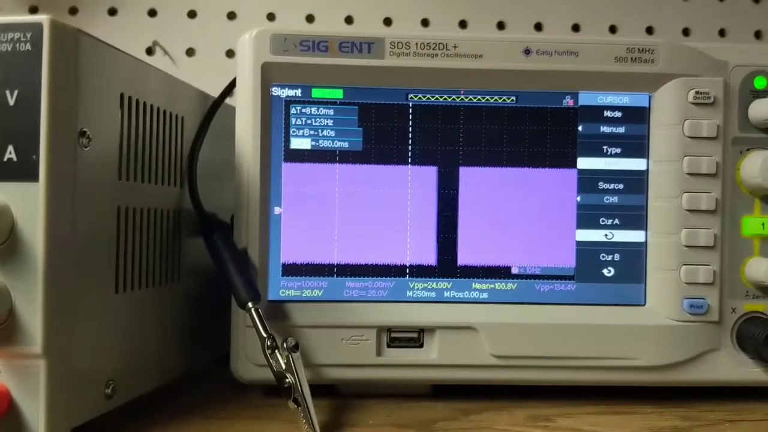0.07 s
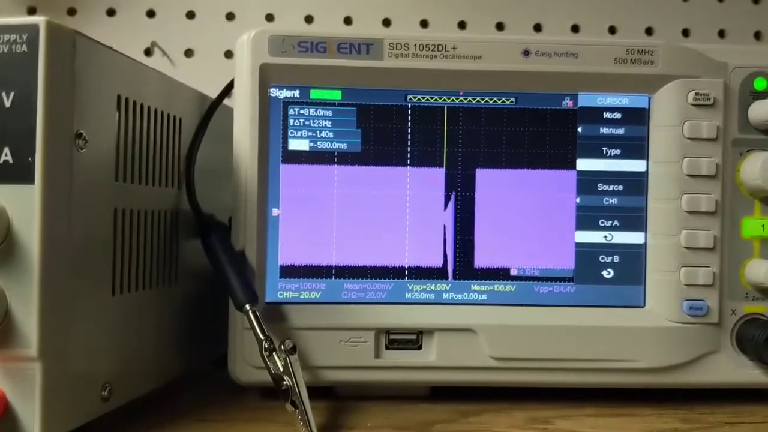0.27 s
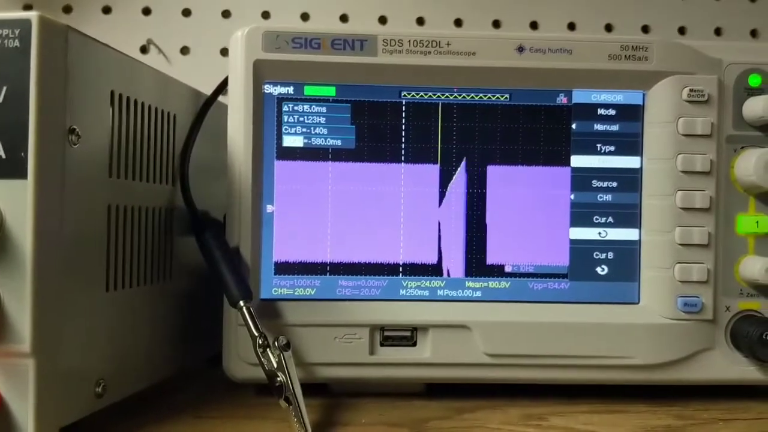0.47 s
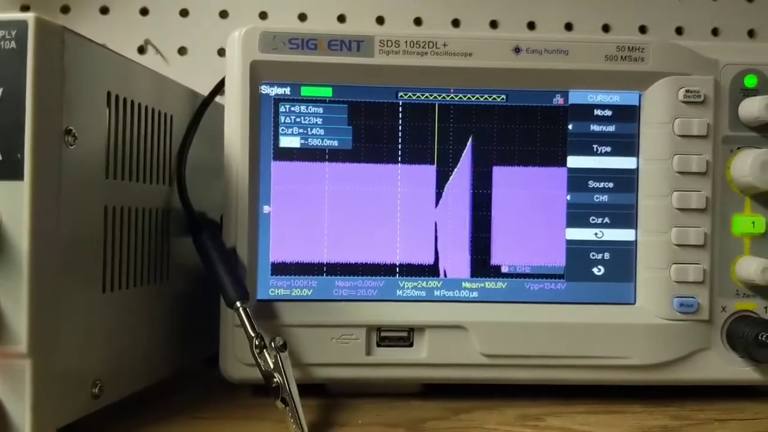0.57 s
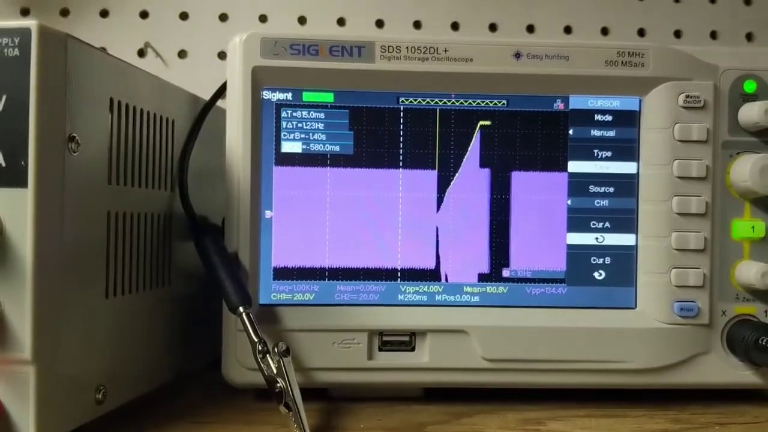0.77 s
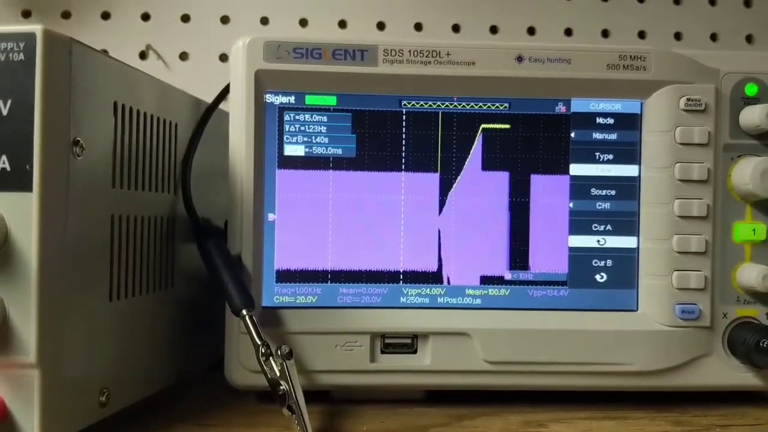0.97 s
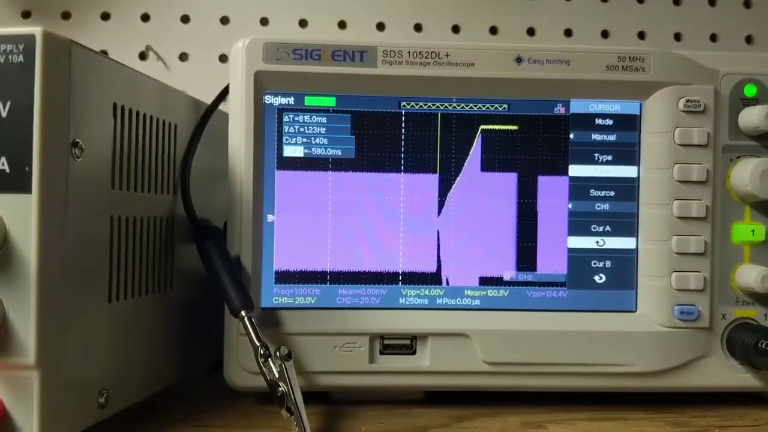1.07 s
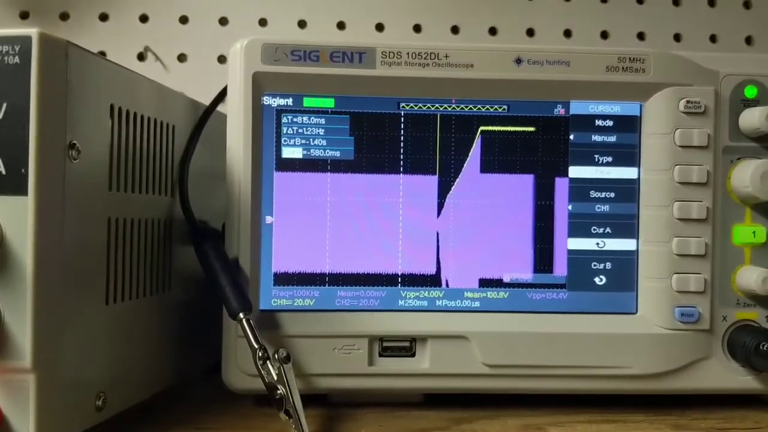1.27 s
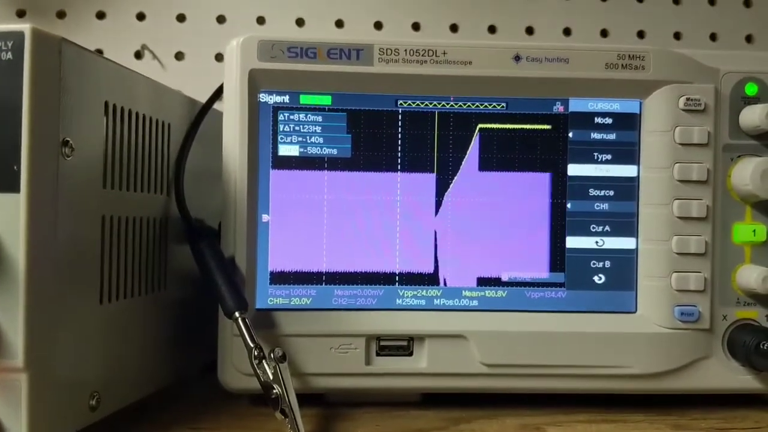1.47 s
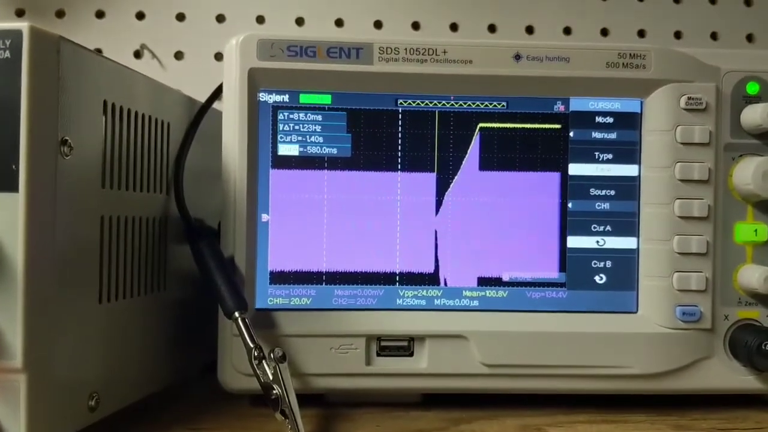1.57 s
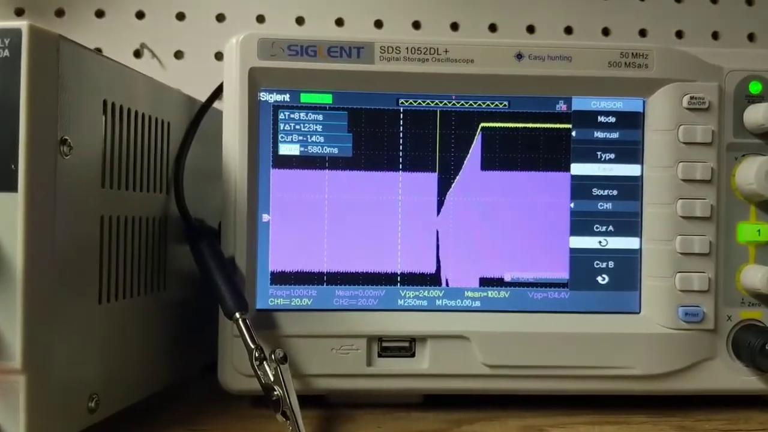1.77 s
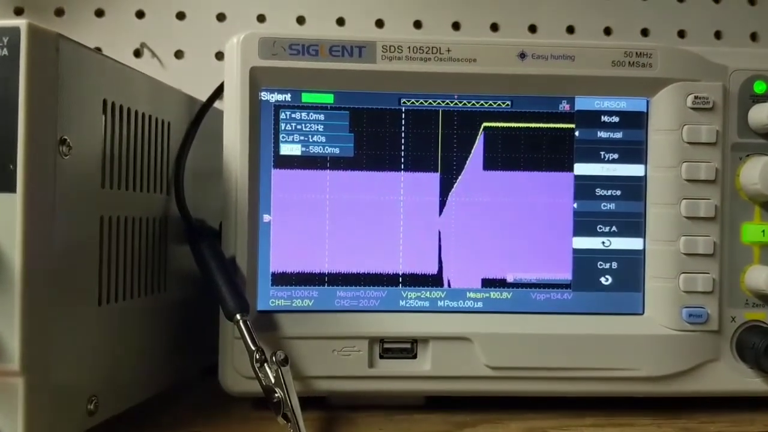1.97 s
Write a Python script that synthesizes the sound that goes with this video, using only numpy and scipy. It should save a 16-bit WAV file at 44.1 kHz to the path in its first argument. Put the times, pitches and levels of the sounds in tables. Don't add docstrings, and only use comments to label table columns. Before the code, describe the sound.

A single sharp spark snap from a shorted capacitor comes almost at once, with bright metallic crackle and a short small-room echo; afterwards only quiet fan hiss, faint whine and low air rumble, picked up by a small microphone.

```python
import sys
import numpy as np
from scipy import signal
from scipy.fft import rfft, irfft
from scipy.io import wavfile
from scipy.ndimage import uniform_filter1d, map_coordinates

SR = 44100
rng = np.random.default_rng(int(sys.argv[2]) if len(sys.argv) > 2 else 0)


def wav_out(sig):
    wavfile.write(sys.argv[1], SR, np.round(np.clip(np.atleast_2d(sig).T, -1, 1) * 32767).astype(np.int16))


def elevation(decibels):
    levels = np.asarray(decibels, float)
    return 10 ** (levels / 20)


N = 88993
SPARK_S = .20308


def unit(x):
    return x / np.sqrt(np.mean(x ** 2) + 1e-20)


def along(points, hz):
    f, value = np.transpose(points)
    return np.interp(np.log(hz + 1), np.log(f + 1), value)


def wobble(rate):
    return map_coordinates(rng.standard_normal(200), [np.arange(N) * rate / SR])


def noise(response):
    f = np.fft.rfftfreq(N + 1, 1 / SR)
    spectrum = rfft(rng.standard_normal(N + 1)) * response(f)
    return unit(irfft(spectrum, N + 1)[:N])


def peak(f, hz, width_hz):
    return 1j * f * width_hz / (hz * hz - f * f + 1j * f * width_hz)


def since(s):
    return np.maximum(np.arange(N) / SR - s, 0)


def dying(s, t60):
    t = since(s)
    return (t > 0) * elevation(-60 * t / t60)


def ringing(modes, s):
    return sum(elevation(db) * dying(s, t60) * np.sin(2 * np.pi * hz * since(s)) for hz, db, t60 in modes)


# f/Hz, width/Hz, level/dB over the plain response
PORT_RING = (8750, 900, 11)


def through_port(colour):
    hz, width_hz, db = PORT_RING
    return noise(lambda f: elevation(along(colour, f)) * (1 + elevation(db) * peak(f, hz, width_hz)))


# t/s, level/dB
AIR = [(0, -40), (.09, -50), (.17, -45), (.28, -50), (.38, -43.5), (.52, -49.5), (.65, -42.5), (.7, -49),
       (.97, -47), (1.121, -43), (1.18, -56.5), (1.278, -36.5), (1.39, -54.5), (1.49, -43.5), (1.76, -44.5),
       (1.82, -51.5), (1.89, -44.5), (2.02, -43.5)]
# f/Hz, width/Hz, level/dB
BOOM = [(70, 15, 0), (97, 11, -5), (45, 14, -16), (142, 12, -16)]


def ventilation():
    strength_db = np.interp(np.arange(N) / SR, *np.transpose(AIR))

    def resonances(f):
        return np.sqrt(sum(np.abs(elevation(db) * peak(f, hz, width) ** 2) ** 2 for hz, width, db in BOOM))

    boom = noise(resonances)
    power = uniform_filter1d(boom ** 2, size=round(.06 * SR))
    swell = np.sqrt(np.abs(power) + 0.018)
    return elevation(strength_db + 1.7) * unit(boom / swell ** 0.56)


# f/Hz, level/dB per Hz
HISS = [(65, -28.5), (110, -3.5), (174, -9), (240, -6), (400, -8), (1900, -21), (7500, -38.5), (15800, -50)]
ORDER = [4, 5, 6, 10, 13, 18, 20, 23, 30, 103.4, 115]
ORDER_DB = [-66, -69, -66, -68, -71, -66.5, -74, -72, -66.5, -87, -89]


def fans():
    shaft_hz, drift, flutter_db = 59.46, .001, 1.5
    hiss_db, sway_db = -51.5, .3
    turns = np.cumsum(shaft_hz * (1 + drift * wobble(3))) / SR
    whine = np.zeros(N)
    for order, db in zip(ORDER, ORDER_DB):
        level = elevation(db + 3 + flutter_db * wobble(11))
        whine += level * np.sin(2 * np.pi * (order * turns + rng.random()))
    hiss = noise(lambda f: elevation(along(HISS, f)))
    return whine + elevation(hiss_db + sway_db * wobble(12)) * hiss


# t/s, level/dB, length/s
RUSTLE = [
    (.82, -81, .015),
    (.86, -82, 0.0097),
    (0.983, -77.5, 0.0093),
    (1.05, -80, 0.029),
    (1.371, -79.5, 0.015),
    (1.68, -83.5, .02),
    (1.747, -72, .015),
]


def rustle():
    port_hz, port_width_hz, port_db = 9030, 900, -82.5
    t = np.arange(N) / SR
    level = elevation(port_db + 3.5 * wobble(19))
    level = level + sum(elevation(db) * np.exp(-((t - s) / length) ** 2) for s, db, length in RUSTLE)
    return level * noise(lambda f: peak(f, port_hz, port_width_hz) ** 2)


# f/Hz, level/dB per Hz
TAIL = [(600, -30), (1300, 0), (2500, -5.5), (5000, -2.5), (7000, -3.5), (10500, -9), (12000, -14.5),
        (15800, -9.5)]
# f/Hz, t60/s
ROOM = [(1000, .15), (4000, 0.21), (8800, 0.2), (15000, .18)]


def room():
    room_db, delay_s = -25.5, .007
    hz, t, z = signal.stft(through_port(TAIL), SR, nperseg=128)
    fading = elevation(-60 * t / along(ROOM, hz)[:, None])
    tail = signal.istft(z * fading, SR, nperseg=128)[1]
    start = round((SPARK_S + delay_s) * SR)
    return elevation(room_db) * np.pad(tail, (start, 0))[:N]


# f/Hz, level/dB, t60/s
BENCH = [(60, -20, .07), (300, -39, .05), (450, -35, .06)]


def bench_thump():
    return -ringing(BENCH, .2083)


# f/Hz, level/dB per Hz
CRACKLE = [(500, -39), (1000, -10.5), (3300, -6), (5300, -1), (7000, -1.5), (10500, -1.5), (12000, -16),
           (15800, -1.5)]
CRACK_S = [
    .2032,
    .2049,
    .2062,
    .2097,
    .2205,
]
# level/dB, t60/s
CRACKS = [(-16, .003), (-11, .008), (-9, .028), (-17, .035), (-27, .03)]


def crackle():
    level = sum(elevation(db - 7) * dying(s, t60) for s, (db, t60) in zip(CRACK_S, CRACKS))
    return through_port(CRACKLE) * level


# f/Hz, level/dB, t60/s
CASE = [(2300, -20, .005), (3300, -12, .004), (3950, -10, .004), (8600, -1.5, .0055), (12600, -15, .0035),
        (15000, -24, .004)]


def metal_ring():
    rise_s = .00018
    return ringing(CASE, SPARK_S) * (1 - np.exp(-since(SPARK_S) / rise_s))


# t/s, signed size, rise/s, fall/s
STEPS = [
    (.20327, -.5, .00025, .00055),
    (.20565, .43, .0001, .0009),
]


def spark():
    pressure = np.zeros(N)
    for s, size, rise, fall in STEPS:
        t = since(s)
        pressure += size * (1 - np.exp(-(t / rise) ** 2)) * np.exp(-t / fall)
    return pressure


def scene():
    background = ventilation() + fans() + rustle()
    snap = room() + bench_thump() + crackle() + metal_ring() + spark()
    return (background + snap)[None]


def low_pass(x):
    return signal.sosfilt(signal.butter(12, 16500, fs=SR, output="sos"), x)


def record(dry):
    self_noise_db, low_cut_hz, top_hz = -79.5, 30, 15830
    duck_db, duck_in_s, duck_hold_s, duck_back_s = -5.5, 0.032, 0.067, 0.027
    t = since(SPARK_S)
    duck = (1 - np.exp(-t / duck_in_s)) * np.exp(-np.maximum(t - duck_hold_s, 0) / duck_back_s)
    heard = dry + elevation(self_noise_db) * rng.standard_normal(dry.shape)
    ducked = heard * elevation(duck_db * duck)
    f = np.fft.rfftfreq(N + 1, 1 / SR)
    low_cut = 1j * f / (low_cut_hz + 1j * f)
    top_cut = np.clip((top_hz + 60 - f) / 150, 0, 1)
    mix = irfft(rfft(ducked, N + 1) * top_cut * low_cut, N + 1)[:, :N]
    return low_pass(mix)


dry = scene()
out = record(dry)
wav_out(out)
```